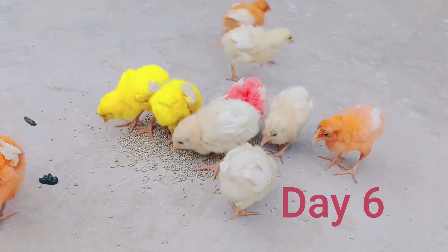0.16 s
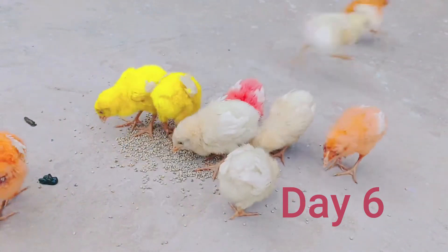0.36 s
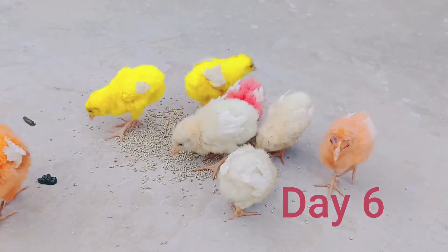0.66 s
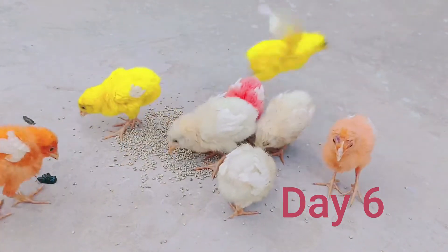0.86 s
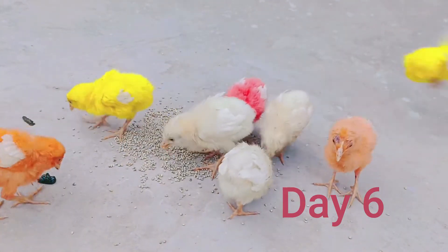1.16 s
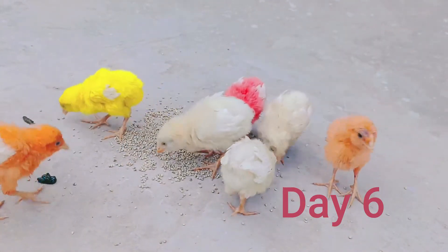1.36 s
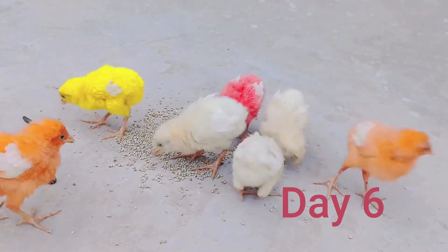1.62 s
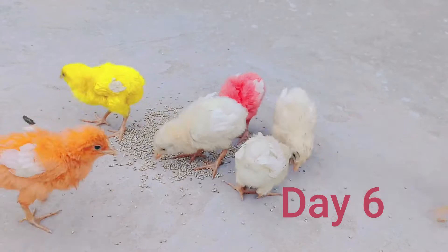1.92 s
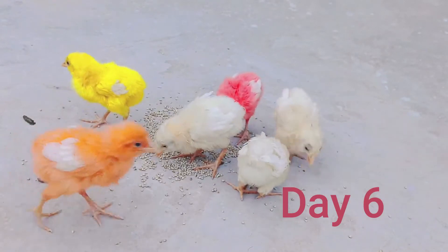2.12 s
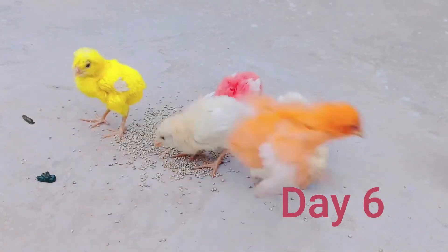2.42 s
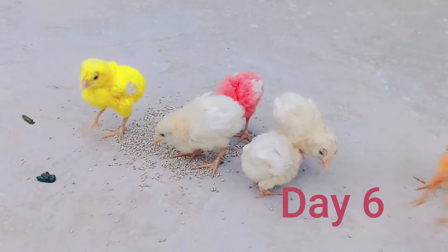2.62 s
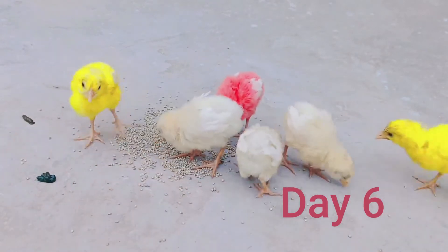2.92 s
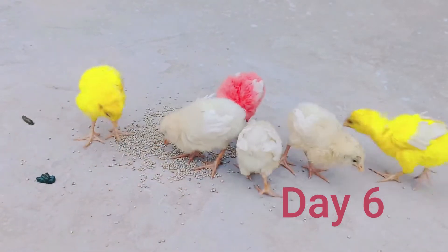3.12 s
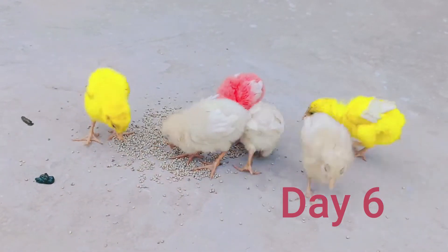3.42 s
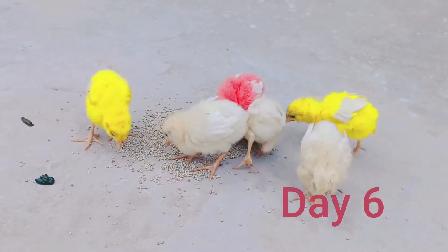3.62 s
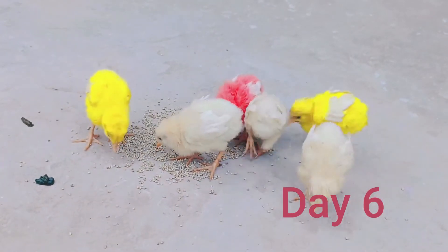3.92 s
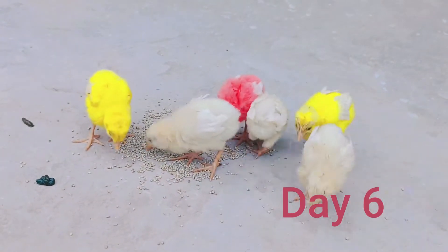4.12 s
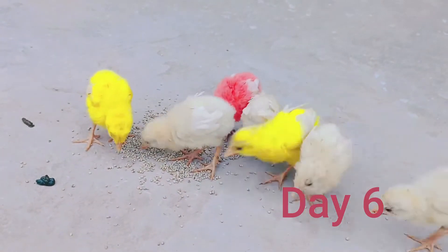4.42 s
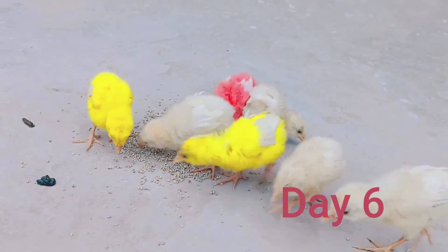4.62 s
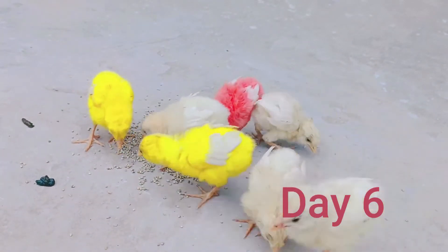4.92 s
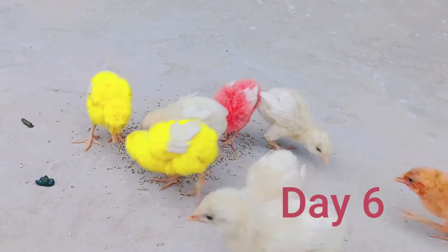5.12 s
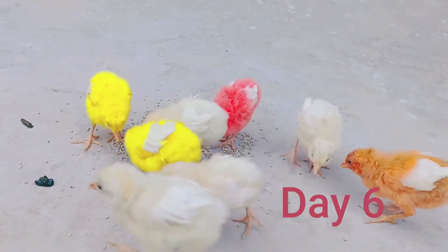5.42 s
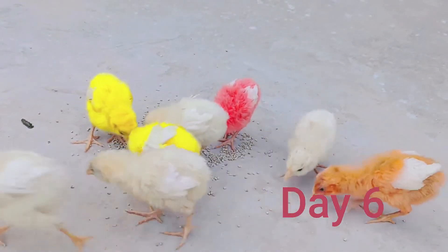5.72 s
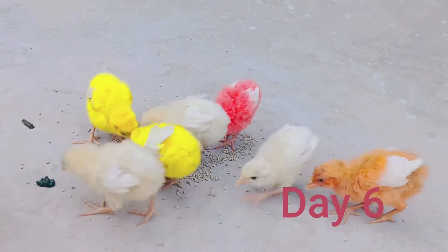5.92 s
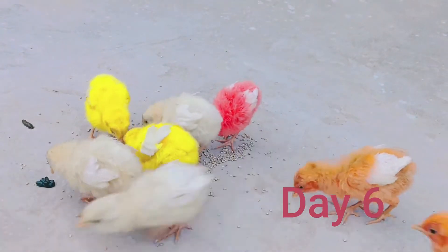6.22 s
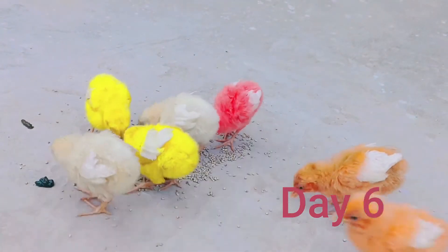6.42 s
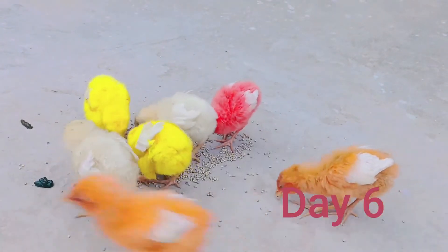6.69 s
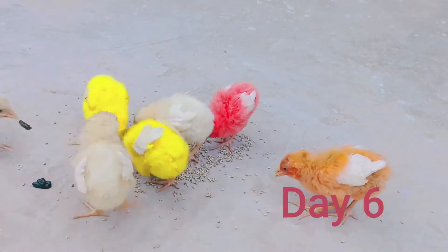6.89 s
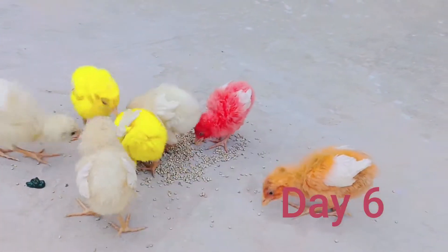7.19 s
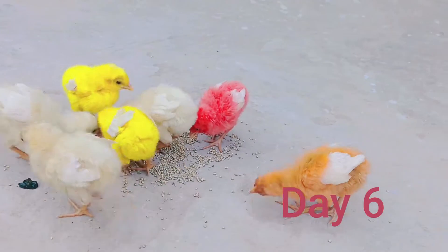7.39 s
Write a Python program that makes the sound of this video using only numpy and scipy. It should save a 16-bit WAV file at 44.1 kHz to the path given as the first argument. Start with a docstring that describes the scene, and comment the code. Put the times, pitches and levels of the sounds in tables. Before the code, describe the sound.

Dense, irregular chirping of young chicks in a bare hard-walled room: thin bright whistles sliding or snapping downward, some sharp and near, others softer and distant. Two peeps just past the middle sound hoarse and fluttering. Occasional light pecks or footfalls knock softly on concrete, mainly later on. Behind everything, a faint wavering motor hum and gentle airy rush continue evenly. The microphone is near the flock, in mono, catching a brief live room ring.

```python
"""Chicks peep over one another from the first instant to the last on the concrete floor of a hard-walled room.
Each peep is a thin whistle with an octave: a high held note, then a glide or snap down. Floor and walls answer.
A light tap of beak or foot (knock, click, crack and tick) lands at 0.7 s; six more follow from 4.2 to 7.1 s.
Two hoarse, fluttering peeps come between 4.2 and 4.9 s. Throughout, fainter chicks peep farther off,
a slow motor hums as wavering sines on multiples of its shaft speed, and shaped noise makes the room's rush."""
import sys
import numpy as np
from scipy import signal
from scipy.fft import rfft, irfft, next_fast_len
from scipy.io import wavfile
from scipy.ndimage import uniform_filter1d, map_coordinates

SR = 44100
rng = np.random.default_rng(int(sys.argv[2]) if len(sys.argv) > 2 else 0)


def master(y):
    """Save y as 16-bit WAV."""
    cut = np.clip(np.atleast_2d(y).T, -1, 1)
    pcm = np.round(cut * 32767)  # scale
    wavfile.write(sys.argv[1], SR, pcm.astype(np.int16))


N = 332955

# All peep levels are those of the voice before the room mix.
# Gliding peeps, a held note that bends at its knee into a fall:
# knee_s, hold_s, fall_s, pitch_hz, knee_hz, end_hz, hold_db, fall_db
GLIDING_PEEPS = [(0.012, 0.017, 0.049, 4840, 4820, 3340, -35, -31),
                 (0.143, 0.042, 0.066, 5300, 4850, 3220, -35.5, -31.0),
                 (0.145, 0.07, 0.069, 5160, 4890, 3540, -40, -30.5),
                 (0.158, 0.022, 0.027, 3450, 3300, 2960, -52, -50),
                 (0.398, 0.057, 0.053, 4773, 4670, 3500, -41, -35),
                 (0.463, 0.041, 0.016, 4650, 4620, 4000, -41, -48),
                 (0.474, 0.045, 0.045, 5410, 4900, 3330, -44, -27),
                 (0.492, 0.11, 0.077, 5310, 5120, 3380, -37.5, -38.5),
                 (0.654, 0.029, 0.074, 6100, 4840, 2680, -45.5, -29),
                 (0.798, 0.1, 0.042, 5120, 4460, 3380, -43.5, -31.5),
                 (0.919, 0.12, 0.012, 5330, 4840, 3630, -48, -35),
                 (0.992, 0.043, 0.042, 4970, 4670, 3160, -40.5, -33),
                 (1.004, 0.058, 0.074, 5700, 5170, 2470, -48, -35),
                 (1.091, 0.15, 0.041, 4510, 4520, 3110, -38.5, -29.5),
                 (1.159, 0.12, 0.048, 5160, 4710, 2730, -40.5, -27),
                 (1.445, 0.16, 0.05, 5550, 4870, 2550, -50, -37.5),
                 (1.526, 0.094, 0.056, 5266, 4700, 3000, -42.5, -29.5),
                 (1.556, 0.077, 0.043, 6120, 5310, 2620, -55, -35.5),
                 (1.68, 0.055, 0.084, 5920, 3950, 2620, -45, -38),
                 (1.894, 0.097, 0.044, 5250, 4820, 3116, -45, -23),
                 (1.892, 0.12, 0.035, 4605, 4440, 3840, -45.5, -36),
                 (1.978, 0.12, 0.051, 5400, 4940, 2790, -49, -40),
                 (2.032, 0.072, 0.078, 6110, 5440, 2940, -58, -34),
                 (2.033, 0.039, 0.054, 5020, 4220, 2746, -47, -32.5),
                 (2.194, 0.077, 0.024, 4857, 4780, 3590, -33, -35.5),
                 (2.205, 0.054, 0.024, 4670, 4340, 3270, -50, -42),
                 (2.275, 0.047, 0.03, 4200, 3740, 3340, -49, -54),
                 (2.286, 0.082, 0.041, 5270, 4670, 3290, -36, -23.5),
                 (2.394, 0.016, 0.043, 4840, 4320, 2860, -52, -41),
                 (2.471, 0.072, 0.045, 4870, 4660, 3010, -43.5, -52),
                 (2.778, 0.105, 0.04, 4770, 4390, 2870, -50.5, -33),
                 (2.779, 0.12, 0.078, 5330, 4980, 3320, -48, -40.0),
                 (2.886, 0.084, 0.036, 5000, 4510, 3330, -44, -31.0),
                 (3.09, 0.045, 0.049, 5030, 4600, 3150, -38.5, -31.5),
                 (3.195, 0.093, 0.046, 5390, 4770, 3330, -41, -24.5),
                 (3.556, 0.11, 0.077, 4570, 4070, 2790, -47, -43),
                 (3.605, 0.13, 0.022, 5690, 4900, 2590, -47.5, -34.5),
                 (3.652, 0.065, 0.053, 4880, 4700, 3360, -45.5, -29),
                 (3.7, 0.084, 0.012, 5280, 4890, 3520, -47, -48),
                 (3.981, 0.1, 0.045, 5650, 4280, 3150, -56, -32.5),
                 (4.003, 0.13, 0.074, 5680, 5190, 3420, -42, -49),
                 (4.065, 0.119, 0.039, 5030, 4590, 3250, -47.5, -31),
                 (4.124, 0.078, 0.045, 5060, 5055, 2380, -46.5, -42),
                 (4.245, 0.056, 0.025, 4290, 3900, 3320, -47, -40),
                 (4.444, 0.064, 0.066, 5580, 4980, 2540, -60, -49),
                 (4.548, 0.083, 0.042, 4830, 4520, 2840, -39.5, -30.5),
                 (4.634, 0.1, 0.031, 5620, 5400, 3280, -44, -29),
                 (4.959, 0.044, 0.031, 5590, 5300, 3000, -38, -28.5),
                 (5.043, 0.13, 0.054, 4980, 4524, 3460, -41.5, -34.0),
                 (5.126, 0.059, 0.072, 5680, 4890, 2330, -50, -39.5),
                 (5.304, 0.11, 0.027, 5550, 5146, 3090, -42, -30.5),
                 (5.317, 0.035, 0.047, 5540, 4890, 2610, -36.5, -32),
                 (5.448, 0.097, 0.082, 6140, 5390, 2360, -54.5, -33),
                 (5.452, 0.059, 0.046, 4770, 4430, 3070, -38.5, -33.5),
                 (5.626, 0.092, 0.027, 5690, 5290, 3580, -42, -28),
                 (5.637, 0.1, 0.019, 5010, 4230, 2380, -42.5, -32.5),
                 (5.75, 0.03, 0.097, 4400, 4130, 2510, -47, -50.5),
                 (5.804, 0.052, 0.072, 5660, 5080, 2450, -47.5, -39.5),
                 (5.936, 0.098, 0.035, 4660, 4210, 3270, -41, -37),
                 (5.974, 0.179, 0.034, 6020, 5260, 2810, -44, -30.0),
                 (6.179, 0.084, 0.064, 5620, 4840, 2330, -50, -43),
                 (6.205, 0.18, 0.032, 4310, 3230, 2640, -53.5, -36),
                 (6.287, 0.091, 0.036, 5650, 5220, 3430, -44, -31),
                 (6.291, 0.084, 0.038, 4790, 4460, 3270, -36.5, -33),
                 (6.366, 0.063, 0.03, 4300, 4010, 2910, -45, -50),
                 (6.368, 0.049, 0.028, 4870, 4690, 2610, -43.5, -43.5),
                 (6.493, 0.14, 0.043, 4540, 4300, 3380, -53, -36),
                 (6.511, 0.14, 0.079, 6120, 5220, 2550, -52.5, -30.5),
                 (6.637, 0.098, 0.045, 5380, 5110, 3200, -41.5, -30.5),
                 (6.717, 0.029, 0.038, 3850, 3660, 3350, -38, -46),
                 (6.789, 0.139, 0.052, 5150, 4190, 3690, -40, -49),
                 (6.807, 0.035, 0.083, 5180, 4650, 2940, -39.5, -34.5),
                 (6.95, 0.077, 0.051, 4610, 4180, 2470, -48.0, -37),
                 (6.953, 0.099, 0.079, 6280, 4870, 2490, -49, -34),
                 (7.085, 0.088, 0.03, 5350, 5030, 3400, -43, -29),
                 (7.128, 0.16, 0.022, 4810, 4260, 3380, -43, -36.5),
                 (7.183, 0.098, 0.034, 5170, 4770, 2550, -48.5, -38.5),
                 (7.385, 0.062, 0.061, 5220, 4630, 3220, -41.5, -35.5),
                 (7.44, 0.08, 0.027, 5360, 4880, 3930, -37, -29.5),
                 (7.458, 0.035, 0.041, 5480, 4610, 3290, -34.5, -33),
                 (7.509, 0.074, 0.019, 5454, 5170, 4340, -34.5, -39)]
# Breaking peeps, where the voice snaps down at the knee and slides on:
# knee_s, hold_s, slide_s, pitch_hz, knee_hz, landing_hz, hold_db, slide_db
BREAKING_PEEPS = [(0.218, 0.081, 0.032, 6020, 4750, 3430, -49, -31.5),
                  (0.247, 0.07, 0.034, 5560, 4900, 3694, -41.5, -19),
                  (0.671, 0.084, 0.032, 5260, 4920, 3710, -41, -16.0),
                  (1.222, 0.0973, 0.024, 5410, 4990, 3600, -45, -19.5),
                  (1.382, 0.099, 0.042, 4880, 4590, 3490, -37.5, -35.5),
                  (2.445, 0.087, 0.045, 6230, 5220, 3700, -52, -34.5),
                  (2.559, 0.09, 0.03, 5250, 4750, 3690, -40.0, -20.0),
                  (2.85, 0.089, 0.049, 6360, 5500, 3850, -49.5, -31.5),
                  (3.27, 0.092, 0.02, 5230, 4280, 3340, -36, -27.5),
                  (3.322, 0.085, 0.042, 6350, 5160, 3710, -45, -29.5),
                  (3.866, 0.041, 0.048, 4875, 4360, 3830, -33.5, -32.0),
                  (3.868, 0.078, 0.03, 6230, 5220, 3440, -48, -35),
                  (4.295, 0.072, 0.045, 5540, 5280, 3750, -39, -27.5),
                  (4.806, 0.11, 0.045, 5555, 4610, 3610, -45, -31.5),
                  (5.892, 0.096, 0.037, 4760, 4630, 3470, -40.5, -36),
                  (6.463, 0.076, 0.044, 5200, 4720, 3630, -46, -38.0),
                  (6.634, 0.079, 0.014, 4830, 4410, 3200, -38, -35),
                  (7.232, 0.066, 0.016, 4690, 4260, 3180, -36.5, -34.5),
                  (7.286, 0.077, 0.03, 5350, 4650, 3400, -46, -30)]
# Hoarse peeps, where a slower flutter of the membrane adds side tones:
# knee_s, hold_s, fall_s, pitch_hz, knee_hz, end_hz, hold_db, fall_db
FLUTTERING_PEEPS = [(4.331, .104, 0.042, 5790, 5200, 2880, -39, -32),
                    (4.802, .105, 0.025, 5780, 5200, 4100, -42.5, -35.5)]


def chicks(direct_db=-1.29, wet_db=-6.0, near_db=-28, dryness=1.05, bounce_s=0.003, bounce_gain=0.3):
    """Every peep comes from a new spot; those louder than near_db are near and so drier (dryness in dB per dB)."""
    out = np.zeros(N)
    voices = [(gliding_peep, GLIDING_PEEPS), (breaking_peep, BREAKING_PEEPS), (hoarse_peep, FLUTTERING_PEEPS)]
    for call, table in voices:
        for knee_s, hold_s, *shape, hold_db, fall_db in table:
            start_s = knee_s - hold_s
            whistle, octave = call(hold_s, *shape, hold_db, fall_db)
            peep = whistle + octave
            direct = amp(direct_db) * peep
            add(out, start_s, direct)

            over_db = max(0, max(hold_db, fall_db) - near_db)
            reflection_gain = amp(-dryness * over_db)
            # the bounce off the floor carves notches into each slide
            bounce_delay_s = bounce_s * (0.5 + rng.random())
            add(out, start_s + bounce_delay_s, bounce_gain * reflection_gain * direct)
            add(out, start_s, amp(wet_db) * reflection_gain * room(peep, wall_share=0.34))
    return out


# A peep starts ONSET_DB under its hold level and reaches it after this share of the hold
ONSET_DB, ATTACK_SHARE = -8.5, 0.4


def gliding_peep(hold_s, fall_s, pitch_hz, knee_hz, end_hz, hold_db, fall_db,
                 bend=1.3, knee_share=0.28, peak_share=0.54, end_db=-9):
    """The held note bends into a fall and moves to its fall level on the way down."""
    t = np.arange(int((hold_s + fall_s) * SR)) / SR
    fallen = np.clip((t - hold_s) / fall_s, 0, 1) ** bend
    hz = held_note(t, hold_s, pitch_hz, knee_hz) + (end_hz - knee_hz) * fallen

    moments = [0, ATTACK_SHARE * hold_s, hold_s, hold_s + peak_share * fall_s, hold_s + fall_s]
    knee_db = hold_db + knee_share * (fall_db - hold_db)
    levels_db = [hold_db + ONSET_DB, hold_db, knee_db, fall_db, fall_db + end_db]
    return syrinx(hz, np.interp(t, moments, levels_db))


# A break takes SNAP_S; after it the pitch slides down at a steady rate
SNAP_S, SLIDE_HZ_PER_S = 0.0102, 23000


def breaking_peep(hold_s, slide_s, pitch_hz, knee_hz, landing_hz, hold_db, slide_db,
                  knee_share=0.15, landing_db=-1.5, peak_share=0.43, end_db=-16):
    """The held note snaps to a low register, changes to its slide level and slides on down."""
    landing_s = hold_s + SNAP_S
    t = np.arange(int((landing_s + slide_s) * SR)) / SR
    snapped = np.clip((t - hold_s) / SNAP_S, 0, 1)
    low_hz = landing_hz - SLIDE_HZ_PER_S * np.maximum(t - landing_s, 0)
    hz = (1 - snapped) * held_note(t, hold_s, pitch_hz, knee_hz) + snapped * low_hz

    moments = [0, ATTACK_SHARE * hold_s, hold_s, landing_s, landing_s + peak_share * slide_s, landing_s + slide_s]
    knee_db = hold_db + knee_share * (slide_db - hold_db)
    levels_db = [hold_db + ONSET_DB, hold_db, knee_db, slide_db + landing_db, slide_db, slide_db + end_db]
    return syrinx(hz, np.interp(t, moments, levels_db))


def hoarse_peep(hold_s, fall_s, *note, flutter_hz=380, depth=1.1, unsteady=0.4):
    """A gliding peep whose level flutters unevenly, which adds side tones; the flutter dies out in the fall."""
    voice = gliding_peep(hold_s, fall_s, *note)
    t = np.arange(voice.shape[1]) / SR
    cycles = np.cumsum(flutter_hz * (1 + unsteady * wobble(110, len(t)))) / SR
    fade = np.clip((hold_s + fall_s - t) / fall_s, 0, 1)
    return voice * (1 + depth * np.sin(2 * np.pi * cycles) * fade)


# Opening scoop (share of the pitch), its time constant, curvature of the sag
SCOOP, SCOOP_S, ARCH = 0.014, 0.012, 1.7


def held_note(t, hold_s, pitch_hz, knee_hz):
    """The held note scoops up, then sags ever faster to the knee."""
    scooped_hz = pitch_hz * (1 - SCOOP * np.exp(-t / SCOOP_S))
    return scooped_hz + (knee_hz - pitch_hz) * np.clip(t / hold_s, 0, 1) ** ARCH


# Colour of a peep's octave, added to its base level: octave_hz, colour_db
OCTAVE_COLOUR = [(5500, 27), (7000, 13), (7600, 1.5), (9000, -3.5), (10400, -5), (11500, -19)]


def syrinx(hz, db, waver=0.0042, flutter_db=2.5, octave_db=-39.0, octave_spread_db=1.6, octave_lag=0.2,
           usual_db=-37, octave_flutter_db=4, rise_s=0.007, close_s=0.0013):
    """A whistle and its octave from a pitch and a level; the octave grows more slowly than the whistle."""
    size = len(hz)
    t = np.arange(size) / SR
    # the muscles round off the corners of the glide
    hz = uniform_filter1d(hz, size=130, mode="nearest") * (1 + waver * wobble(160, size))
    phase = 2 * np.pi * np.cumsum(hz) / SR

    opening = np.minimum(t / rise_s, (t[-1] - t) / (2 * close_s))
    gate = np.sin(np.pi / 2 * np.clip(opening, 0, 1)) ** 2
    strength = gate * amp(db + flutter_db * wobble(104.0, size))

    bright_db = octave_db + octave_spread_db * rng.normal() - octave_lag * (db - usual_db)
    colour_db = along(OCTAVE_COLOUR, 2 * hz)
    octave_gain = amp(bright_db + colour_db + octave_flutter_db * wobble(170, size))
    return strength * np.array([np.sin(phase), octave_gain * np.sin(2 * phase)])


# Taps of beaks and feet; click and tick trims add to the common click_db and tick_db:
# start_s, level_db, click_trim_db, tick_trim_db
FLOOR_TAPS = [(0.678, -37.5, -29, -62), (4.181, -44.5, -13, -23), (5.502, -38.5, -7, -55.5),
              (5.816, -38.5, -8, -60), (6.159, -36, -20, -63.5), (6.592, -38.5, -21, -42.5),
              (7.056, -41, -16, -57)]


def taps(knock_hz=620, knock_t60=0.021, click_hz=2250, click_t60=0.009, click_db=8,
         crack_db=-6, crack_t60=0.028, tick_db=3, tick_t60=0.012, dull_hz=2600, wet_db=-2):
    """Each tap is a dead knock, a short click and a noisy crack, all dulled, plus an unfiltered noise tick."""
    out, t = np.zeros(N), np.arange(SR // 10) / SR
    soft = signal.butter(3, dull_hz, fs=SR, output="sos")
    for start_s, level_db, click_trim_db, tick_trim_db in FLOOR_TAPS:
        tap_knock_hz = knock_hz * np.exp(0.05 * rng.normal())
        knock = amp(-60 * t / knock_t60) * np.sin(2 * np.pi * tap_knock_hz * t)
        click = amp(click_db + click_trim_db - 60 * t / click_t60) * np.sin(2 * np.pi * click_hz * t)
        crack_noise = unit(signal.sosfilt(soft, rng.standard_normal(len(t))))
        crack = amp(crack_db - 60 * t / crack_t60) * crack_noise
        tick = amp(tick_db + tick_trim_db - 60 * t / tick_t60) * rng.standard_normal(len(t))
        tap = amp(level_db) * (signal.sosfilt(soft, knock + click + crack) + tick)
        add(out, start_s, tap)
        add(out, start_s, amp(wet_db) * room(tap, wall_share=0.35))
    return out


def far_chicks(level_db=-55.0, swell_db=3, spread_db=2, hold_s=0.076, fall_s=0.048,
               pitch_hz=4950, knee_hz=4550, end_hz=3200, wet_db=-2, count=22):
    """Birds farther off peep faintly at loosely spaced moments; their octave is heard only in the room's answer."""
    out = np.zeros(N)
    for k, (when, pace, pitch, loud) in enumerate(rng.standard_normal((count, 4))):
        start_s = abs(k + 0.5 + 0.33 * when) * N / SR / count
        slow, high = np.exp(0.2 * pace), np.exp(0.07 * pitch)
        hold_db = level_db + spread_db * loud
        whistle, octave = gliding_peep(slow * hold_s, slow * fall_s, high * pitch_hz, high * knee_hz,
                                       high * end_hz, hold_db, hold_db + swell_db)
        add(out, start_s, whistle)
        add(out, start_s, amp(wet_db) * room(whistle + octave, wall_share=0.98))
    return out


SHAFT_HZ = 22.68
# Motor tones, each played on the multiple of the shaft speed nearest its pitch: nominal_hz, level_db (rms)
MOTOR_TONES = [(43.1, -65.5), (70.0, -66), (113.0, -60.5), (134.6, -60), (156.1, -62.5), (204.6, -67.5),
               (226.1, -58), (247.6, -71), (274.5, -68.5), (296.1, -61.5), (339.1, -66), (409.1, -72),
               (522.2, -68), (565.2, -70), (635.2, -72), (839.8, -66.5), (882.9, -74), (952.8, -70),
               (974.4, -74), (1044, -89), (1200, -77), (1314, -72), (1362, -81), (1432, -80.5)]


def motor(drift=0.0008, waver_db=-0.82):
    """Tones on multiples of the shaft speed drift together in pitch, each wavering a little in level."""
    turns = SHAFT_HZ * np.cumsum(1 + drift * wobble(1.487, N)) / SR
    out = np.zeros(N)
    for nominal_hz, level_db in MOTOR_TONES:
        multiple = round(nominal_hz / SHAFT_HZ)
        tone = np.sqrt(2) * np.sin(2 * np.pi * (multiple * turns + rng.random()))
        out += amp(level_db + waver_db * wobble(1.8, N)) * tone
    return out


# Colour of the room air and hiss, relative levels only: pitch_hz, density_db (per Hz)
AIR_COLOUR = [(20, -16), (45, -5.5), (85, 2), (130, 7), (200, -1.5), (400, -6), (850, -4.5), (1600, -12),
              (2600, -12), (5000, -11), (6500, -21.5), (7500, -45.5), (11000, -51), (13500, -56),
              (15200, -42)]


def air(level_db=-54):
    """The steady rush of the room: white noise shaped by the air's colour."""
    rush = filtered(rng.standard_normal(N), lambda hz: amp(along(AIR_COLOUR, hz)))
    return amp(level_db) * unit(rush)


# Room decay: pitch_hz, t60_s
ROOM_DECAY = [(300, 0.13), (3300, 0.31), (5200, 0.42), (6500, 0.37), (10000, 0.28)]


def room(x, gap_s=0.004, wall_s=0.02, wall_share=0.5, count=10):
    """The answer of the room from one spot: a few early walls and a diffuse tail that decays by pitch."""
    hz, t, z = signal.stft(rng.standard_normal(SR // 2), SR, nperseg=256)
    decay = amp(-60 * t / along(ROOM_DECAY, hz)[:, None])
    tail = signal.istft(z * decay, SR, nperseg=256)[1]
    tail = tail * np.clip(np.arange(len(tail)) / SR / (2 * gap_s), 0, 1)

    delays = (SR * (gap_s + wall_s * rng.random(count))).astype(int)
    walls = np.bincount(delays, rng.choice([-1, 1], count), len(tail)) / np.sqrt(count)
    # the shares split the energy between tail and walls
    diffuse = np.sqrt(1 - wall_share) * tail / np.linalg.norm(tail)
    return signal.fftconvolve(x, diffuse + np.sqrt(wall_share) * walls)


def amp(db):
    """Decibels to gain."""
    return 10 ** (np.asarray(db) / 20)


def unit(x):
    """Scale to rms 1."""
    return x / np.sqrt(np.mean(x ** 2) + 1e-20)


def along(points, hz):
    """Read (Hz, value) points on a log frequency axis."""
    f, v = np.transpose(points)
    return np.interp(np.log(hz + 1), np.log(f + 1), v)


def wobble(rate, size):
    """A smooth random curve with rate knots a second."""
    knots = rng.standard_normal(int(size * rate / SR) + 4)
    return map_coordinates(knots, [np.arange(size) * rate / SR])


def filtered(x, response):
    """Multiply the spectrum of x by a response of frequency."""
    m = next_fast_len(N + SR // 2)
    return irfft(rfft(x, m) * response(np.fft.rfftfreq(m, 1 / SR)), m)[:N]


def add(track, start_s, sound):
    """Mix a sound into the track at start_s, or at zero if that is earlier."""
    start = max(0, round(start_s * SR))
    part = track[start:start + len(sound)]
    part += sound[:len(part)]


def scene():
    """Near and far chicks and taps over the motor hum and the room's rush, in mono."""
    return (chicks() + far_chicks() + taps() + motor() + air())[None]


TOP_HZ = 15720


def record(dry):
    """The recorder keeps nothing above its band limit."""
    return np.array([filtered(channel, lambda hz: hz < TOP_HZ) for channel in dry])


dry = scene()
out = record(dry)
master(out)
```